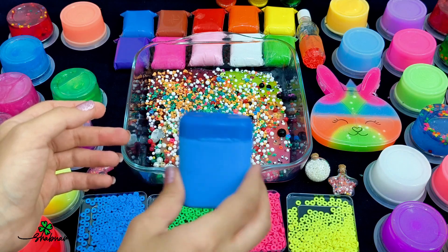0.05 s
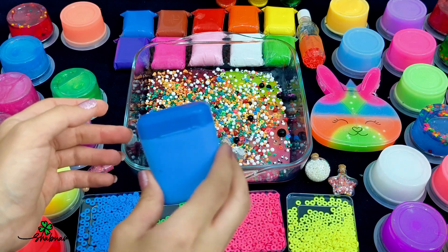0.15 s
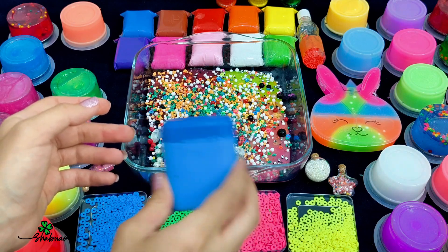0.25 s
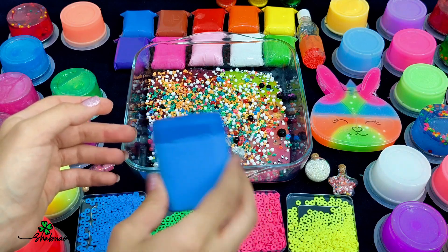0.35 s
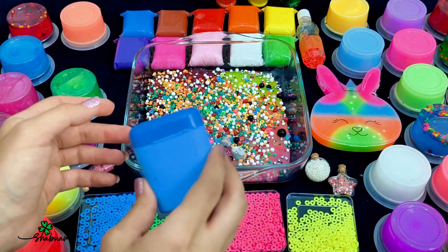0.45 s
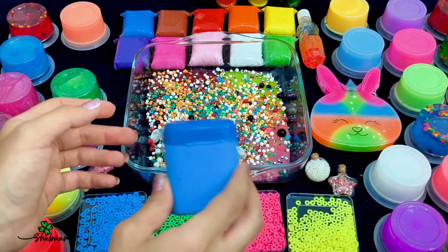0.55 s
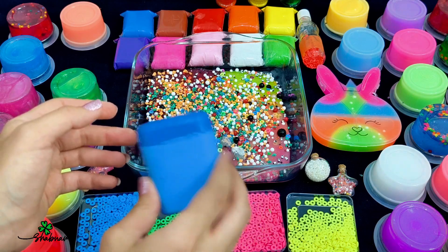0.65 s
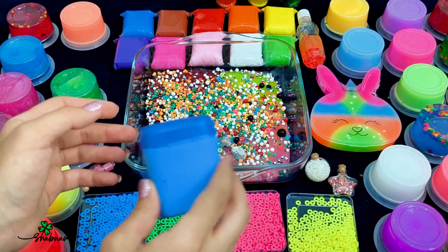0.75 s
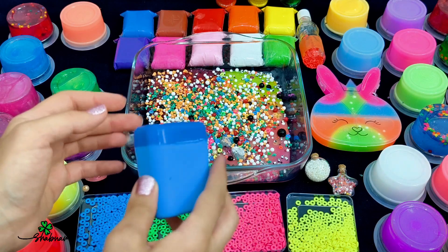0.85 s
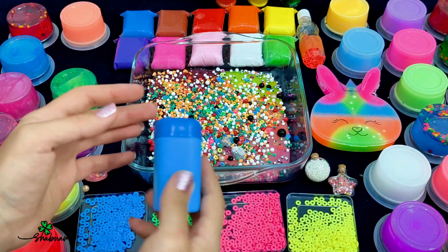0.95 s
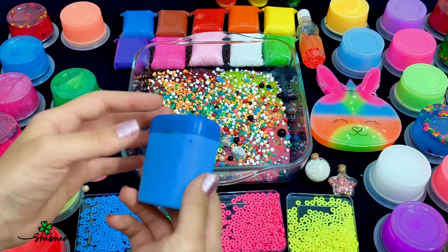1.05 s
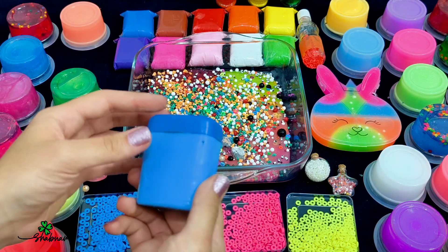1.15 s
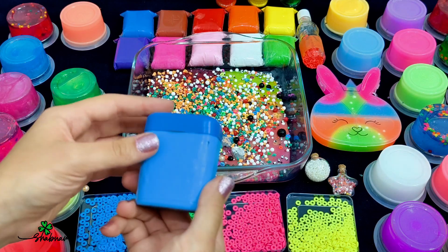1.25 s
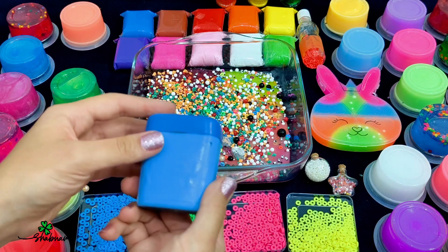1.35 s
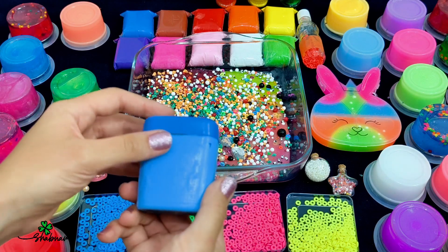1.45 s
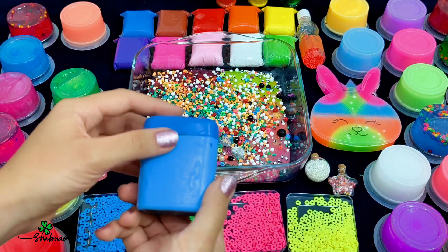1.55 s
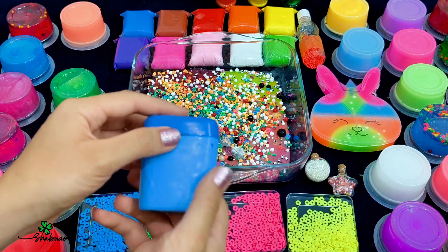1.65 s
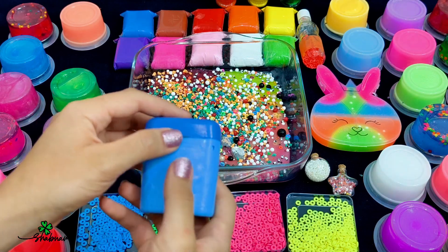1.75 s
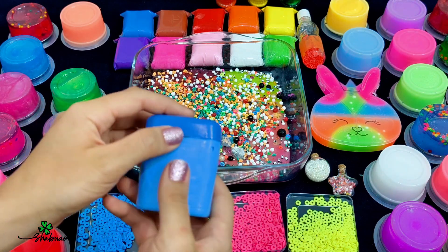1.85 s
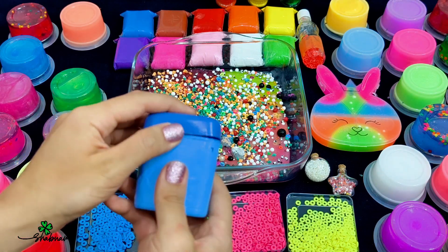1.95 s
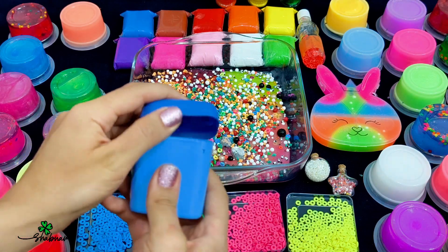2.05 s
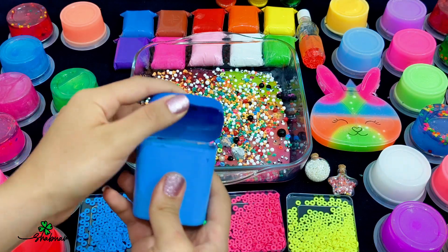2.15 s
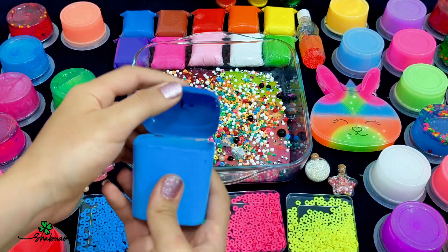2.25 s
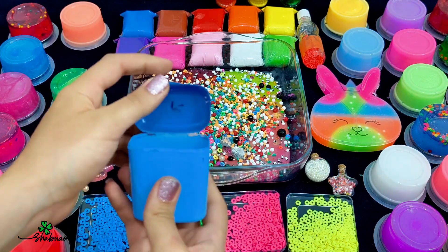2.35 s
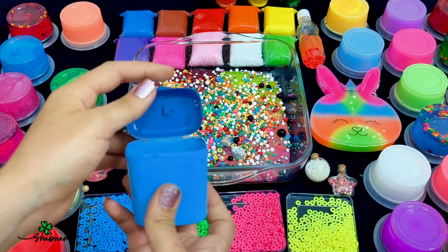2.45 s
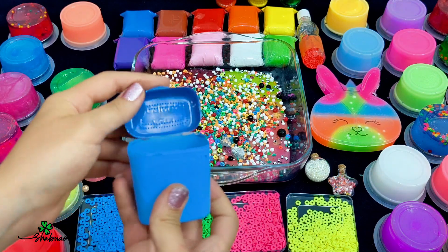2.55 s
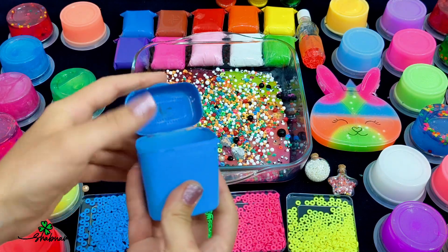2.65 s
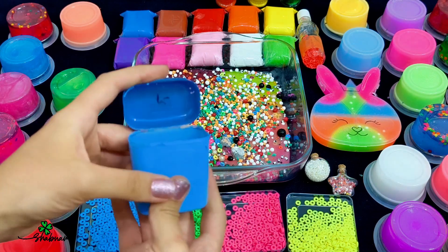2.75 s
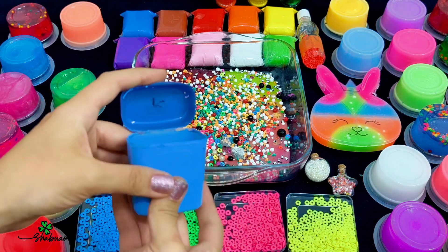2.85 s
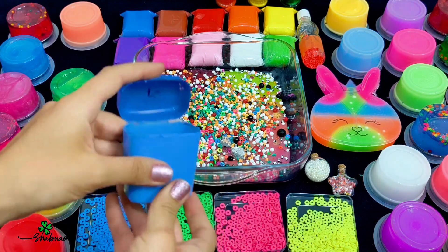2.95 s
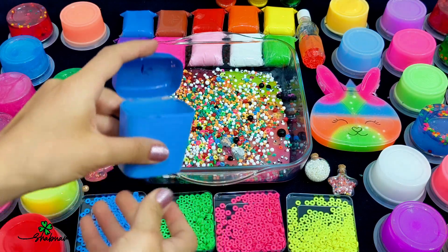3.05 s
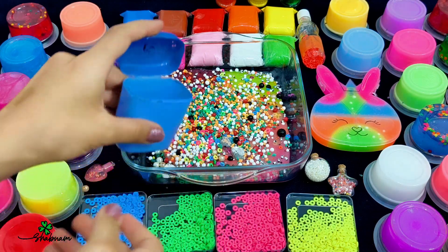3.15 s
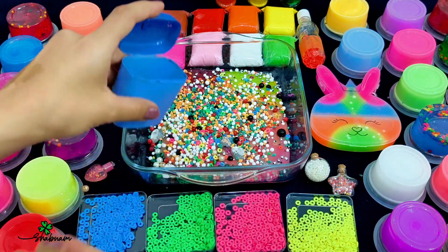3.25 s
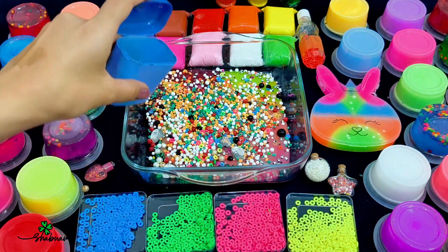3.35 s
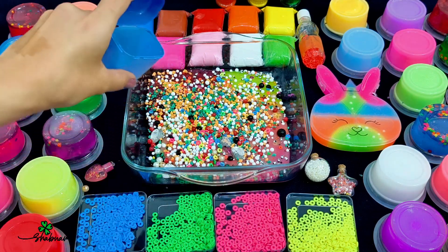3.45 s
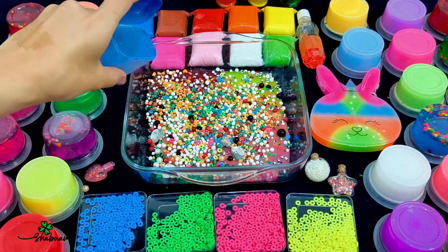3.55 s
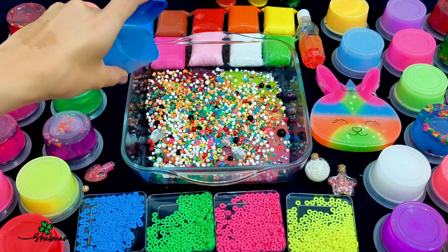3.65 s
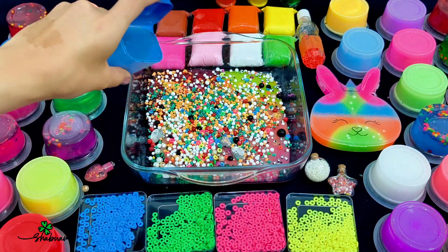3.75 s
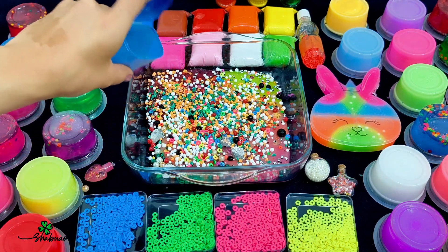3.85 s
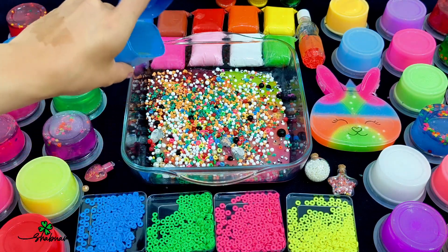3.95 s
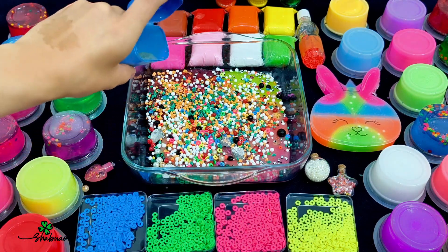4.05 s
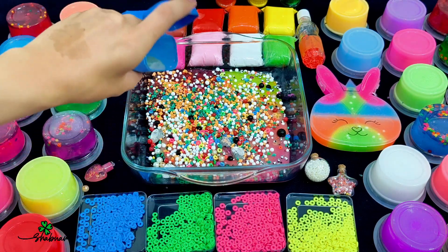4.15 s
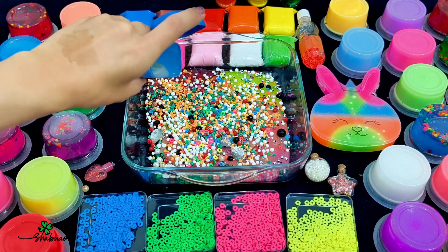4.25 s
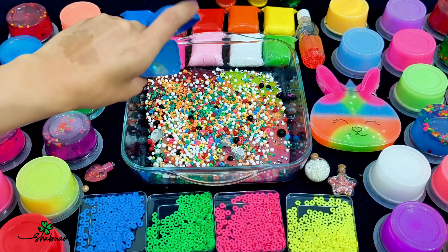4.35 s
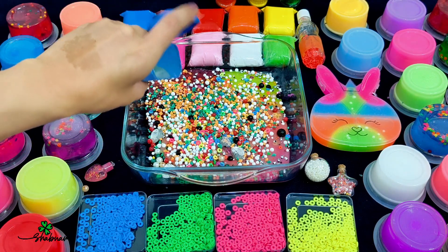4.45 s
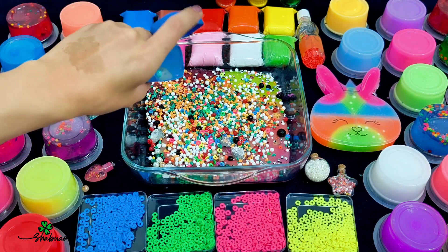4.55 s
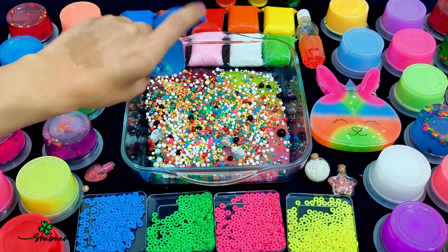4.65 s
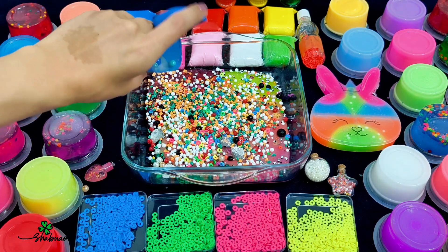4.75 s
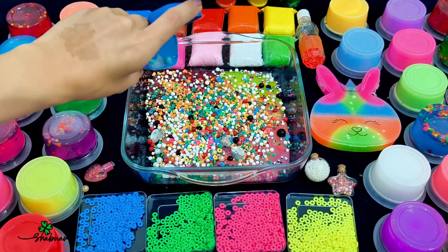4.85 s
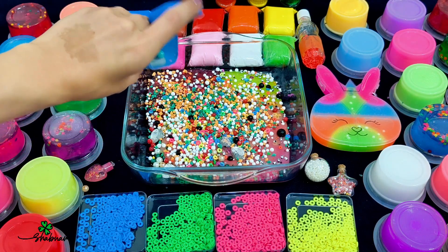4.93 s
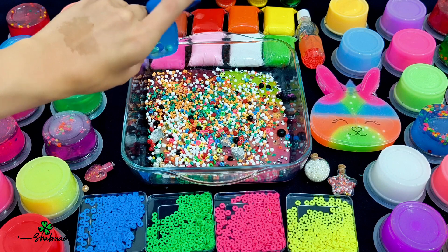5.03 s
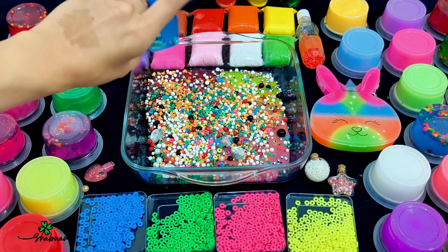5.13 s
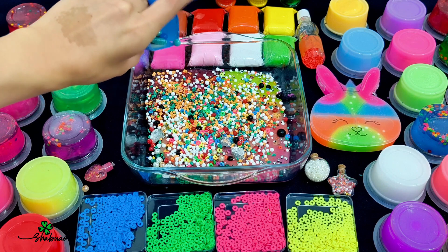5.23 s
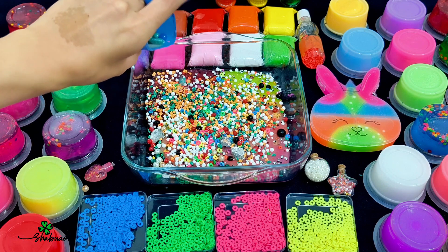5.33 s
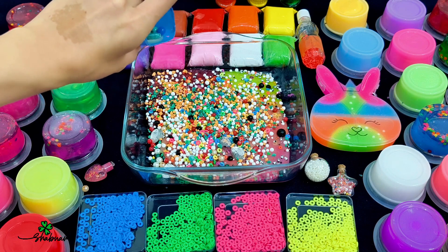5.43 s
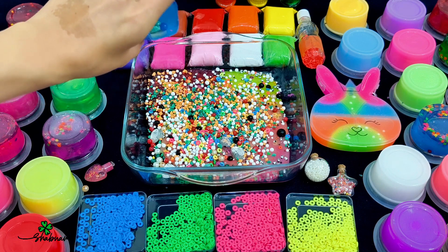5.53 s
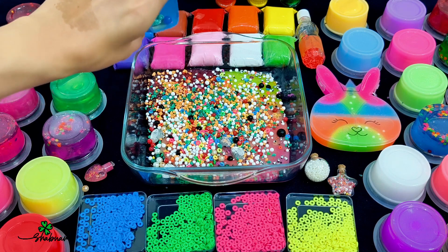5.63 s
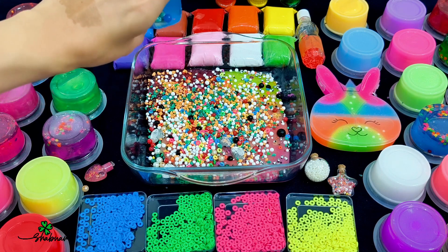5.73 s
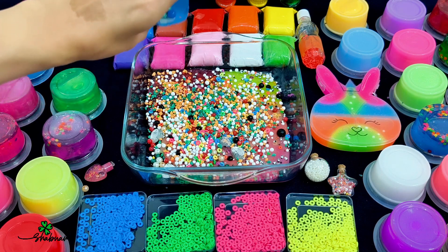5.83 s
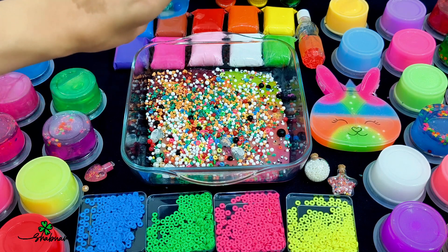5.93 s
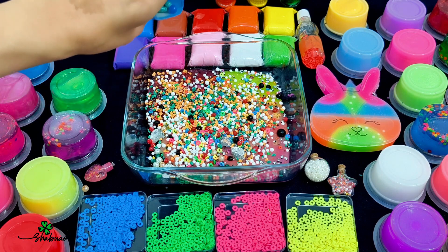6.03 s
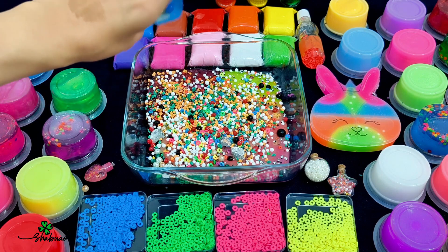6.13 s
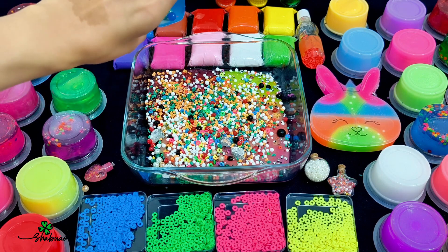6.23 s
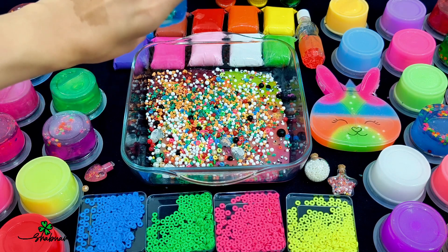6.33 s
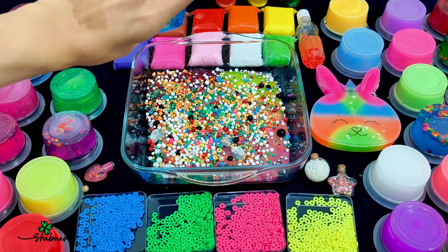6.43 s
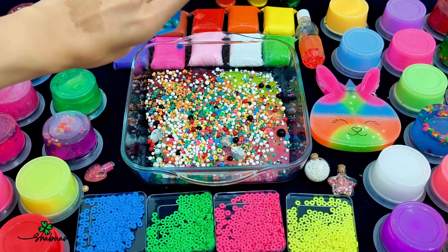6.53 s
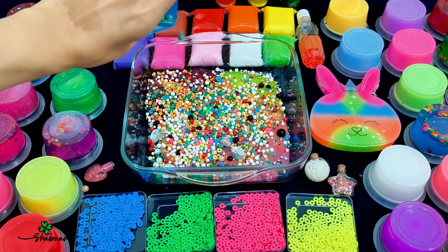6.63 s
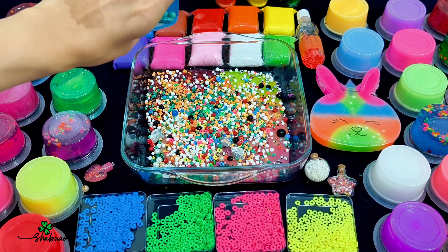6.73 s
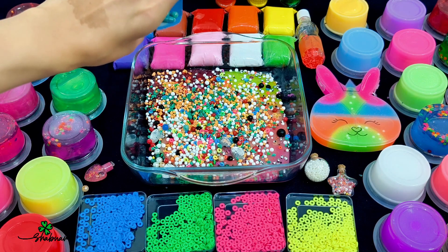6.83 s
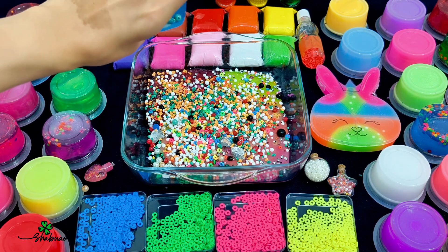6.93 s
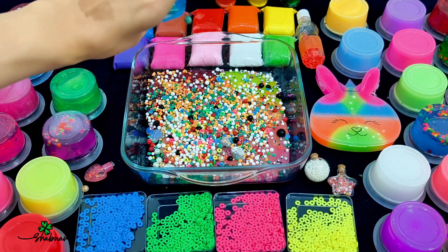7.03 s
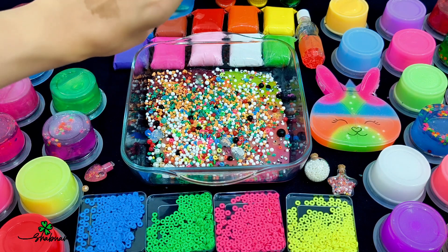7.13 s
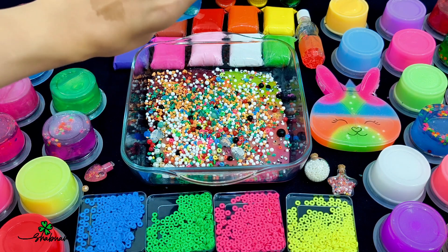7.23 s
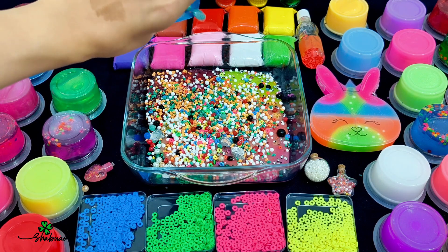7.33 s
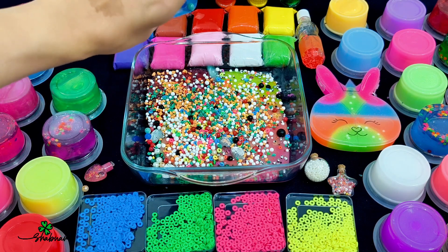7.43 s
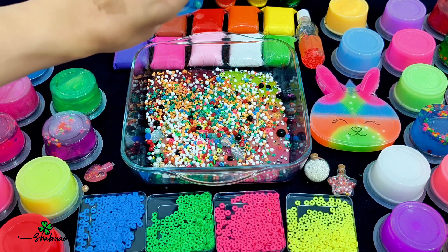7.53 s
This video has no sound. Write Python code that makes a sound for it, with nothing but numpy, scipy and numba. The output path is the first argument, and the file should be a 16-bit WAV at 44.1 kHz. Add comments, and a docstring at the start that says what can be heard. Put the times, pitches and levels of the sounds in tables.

```python
"""Small hard beads rattle in a flip-top plastic box held close to two microphone ports: shaken shut, the lid flipped
open with a puff and a creak, then tipped and jolted so that beads knock about and drop out. Each knock is a burst of
contact noise that rings the enclosed air and the walls and ticks; many small beads patter below, and the shut box
booms. A small room answers with decaying noise over room air and a motor hum of sines, and the ports colour it."""
import sys
import numpy as np
from scipy import signal
from scipy.fft import rfft, irfft
from scipy.io import wavfile
from scipy.ndimage import uniform_filter1d
from numba import njit

SR = 44100
rng = np.random.default_rng(int(sys.argv[2]) if len(sys.argv) > 2 else 0)


def file_out(sig):
    """Save sig as 16-bit WAV at sys.argv[1]."""
    # one column per channel
    cols = np.atleast_2d(sig).T
    # limit, then scale
    lim = np.clip(cols, -1, 1)
    pcm = np.round(lim * 32767).astype(np.int16)
    wavfile.write(sys.argv[1], SR, pcm)


N = 334278

# Loud knocks. Each row: moment in seconds, peaks in dB of the air ring, the walls and the tick, air ring in Hz.
KNOCK_ROWS = [(0.012, -14.5, -45, -49, 1720), (0.0229, -13.5, -34, -45, 1690),
              (0.0432, -13.5, -13, -20, 1690), (0.1075, -19, -55, -27, 1620), (0.138, -33, -20, -38, 1743),
              (0.1725, -22, -35, -18, 2080), (0.1782, -14, -13, -32, 1900),
              (0.2121, -20.5, -17.5, -11, 1690), (0.232, -42, -16, -16, 1910),
              (0.3281, -18, -31, -33, 2220), (0.3524, -24, -18, -29, 1840), (0.37, -17, -11.5, -9.5, 2120),
              (0.3998, -31, -17.5, -17, 1864), (0.417, -30, -19, -17, 1530), (0.423, -21, -30, -30, 1520),
              (0.449, -23, -8.5, -11.5, 2240), (0.4746, -17.5, -26, -22, 2100),
              (0.4922, -13, -36, -39, 1690), (0.5106, -13, -15, -12.5, 2000), (0.586, -37, -13, -15, 1830),
               (0.66, -8.5, -14.5, -21, 1760), (0.6884, -31, -20, -11.5, 1950),
              (0.6983, -22, -22, -16, 1860), (0.717, -30, -35, -34, 2150), (0.7759, -39, -11.5, -23, 2220),
              (0.8215, -14, -23, -20, 1620), (0.8409, -27, -13.5, -10.5, 2040),
              (0.8937, -20, -19, -32, 1650), (0.947, -20, -22, -27, 2030), (0.9683, -46, -38, -41, 1795),
              (0.9987, -25, -46, -47, 1740), (1.0261, -48, -21, -23, 2150), (1.0348, -51, -19.5, -15, 2080),
              (1.0845, -23.5, -31, -46, 1720), (1.114, -22.5, -32, -27, 1730),
              (1.1284, -36, -9.5, -11.5, 2070), (1.173, -29, -20, -26, 1760),
              (1.2108, -34, -22, -15.5, 1700), (1.2398, -29, -27, -32, 1640),
              (1.2792, -29, -19.5, -22.5, 1990), (1.3004, -39, -40, -44, 1860),
              (1.401, -45, -64, -70, 2024), (1.4961, -42, -35.5, -35, 1580),
              (1.5079, -31, -31.5, -52, 1820), (1.5388, -37, -32, -46, 1720),
              (1.626, -37.5, -42.5, -54, 1940), (1.7868, -51, -41.5, -48, 1437),
              (1.843, -48.5, -49, -49, 1660),  (1.9928, -35.5, -29, -34.5, 1830),
              (2.0397, -42, -39, -37, 1455), (2.07, -36, -32, -29.5, 1730), (2.1636, -41, -42, -35, 1050),
              (2.4926, -49, -41.5, -46, 2016),  (2.75, -38.5, -53, -57, 1720),
              (3.038, -21.5, -44, -32, 1960), (3.063, -25, -16, -16.5, 1890), (3.1336, -43, -31, -33, 2260),
              (3.1533, -16.5, -25.5, -26.5, 1280), (3.1834, -23.5, -23, -30, 1310),
              (3.202, -23, -44, -45, 1380), (3.235, -17, -19.5, -22, 1890), (3.284, -20, -22.5, -24, 2130),
              (3.3587, -26, -20, -26, 1815), (3.364, -25.5, -33, -35, 1280),
              (3.3953, -27, -27.5, -28, 1880), (3.446, -35, -38, -55, 1370), (3.523, -23, -25, -31.5, 1640),
              (3.5604, -23.5, -30, -51, 1750), (3.6028, -14.5, -23.5, -31, 1600),
              (3.6284, -23, -41, -39, 1660), (3.7356, -37, -43, -44, 1750), (3.759, -36.5, -56, -66, 1297),
              (3.7997, -29, -27.5, -50, 1340), (3.814, -29, -41, -32, 1520), (3.8508, -27, -24, -30, 1400),
              (3.8721, -22, -24.5, -33, 1980), (3.901, -23.5, -20, -24.5, 1820),
              (3.925, -26, -44, -50, 1330),  (4.2803, -40, -62, -63, 1498),
              (4.3082, -14.5, -20.5, -35, 1350), (4.3763, -34, -36, -36, 1320),
              (4.406, -29, -31.5, -41, 1390), (4.425, -29, -30, -48, 1600), (4.4323, -29, -30, -37, 1466),
              (4.5898, -30.5, -35, -54, 1750), (4.641, -29, -32.5, -53, 1440),
              (4.6623, -22.5, -24, -27.5, 1570), (4.7214, -18, -21.5, -24, 1860),
              (4.785, -43, -25.5, -47, 2020), (4.7958, -30, -26, -38, 1790),
              (4.8087, -14.5, -48, -33, 1530), (4.825, -25, -32, -40, 1530), (4.8502, -47, -32, -33, 1420),
              (4.9243, -16.5, -32, -26.5, 1530), (5.0059, -23.5, -49, -37, 1390),
              (5.022, -27, -50, -24.5, 1530), (5.076, -45, -28.5, -32.5, 1720),
              (5.1666, -20, -20.5, -23, 1430), (5.1787, -28, -20, -21.5, 1220),
               (5.2724, -16.5, -23.5, -28, 1490), (5.2833, -27, -28.5, -31, 1480),
              (5.38, -47, -31, -40, 1540), (5.3897, -25, -25.5, -32.5, 1480),
              (5.4351, -27.5, -51, -57, 1530), (5.481, -29, -44, -70, 1500),
              (5.5028, -34.5, -37, -41, 1475), (5.516, -33, -33, -31, 1428),
              (5.599, -24, -27.5, -20.5, 1450), (5.693, -54, -35.5, -35, 1590),
              (5.723, -24.5, -26, -33, 1470), (5.7374, -16.5, -34, -29.5, 1590),
              (5.8551, -27, -33, -46, 1860), (5.8684, -20, -43, -29, 1460), (5.9844, -38, -32.5, -42, 1650),
              (6.0011, -24.5, -29, -37, 1530), (6.0157, -22.5, -37, -37, 1660),
              (6.104, -23.5, -26.5, -33, 1540), (6.1306, -21.5, -40, -43, 1670),
              (6.1994, -28.5, -53, -62, 1520), (6.2114, -38, -45, -32, 1290),
               (6.2582, -32.5, -35, -30, 1240), (6.3566, -38, -33.5, -59, 1400),
              (6.4995, -24, -33, -30, 1380), (6.6331, -46, -27, -31, 1920), (6.7314, -53, -35, -50, 1544),
              (6.7445, -19, -25, -26, 1510), (6.868, -47, -35.5, -35, 2260), (6.9282, -62, -39, -30, 1580),
              (6.9838, -49, -33, -29.5, 2010), (6.995, -25.5, -31.5, -26, 1520),
              (7.062, -53, -55, -30, 1720), (7.136, -34, -25, -22.5, 1500), (7.1426, -17, -23, -33, 1610),
              (7.277, -37, -29, -34, 1740), (7.282, -35, -32, -28, 2380), (7.3585, -47, -33, -42, 2306),
              (7.4028, -55, -35, -27, 2030), (7.5358, -32, -44, -52, 1120), (7.5417, -38, -35, -36.5, 1950),
              ]
# How hard the small beads patter. Each row: moment in seconds, rms level at the walls in dB before unevenness.
SHAKING_LEVEL = [(0, -29), (.3, -26.5), (.65, -26.5), (.95, -35.5), (1.28, -55), (1.36, -68), (2.0, -73),
                 (2.14, -70), (2.3, -70.5), (2.5, -59.5), (2.68, -74.5), (2.78, -56), (2.97, -74),
                 (3.05, -41), (3.22, -45.5), (3.35, -64), (3.55, -67), (3.85, -55), (4.05, -72),
                 (4.27, -69.5), (4.35, -43), (4.55, -59), (4.8, -51), (5.25, -44), (5.5, -50.5),
                 (5.8, -53.5), (6.35, -50.5), (6.95, -54), (7.58, -50)]

SPAN = 1024  # samples given to the ring of one knock
OPENS_S = 2.03  # the lid opens


def knock_table():
    """Discrete impacts: the columns of the knocks, with their moments in samples."""
    s, air_db, wall_db, tick_db, air_hz = np.transpose(KNOCK_ROWS)
    at = np.clip((s * SR).astype(int), 0, N - 1)
    return at, air_db, wall_db, tick_db, air_hz


def knocks():
    """Impact excitation: a loud blow sets the enclosed air and the walls ringing and ticks at the contact."""
    at, air_db, wall_db, tick_db, air_hz = knock_table()
    note_hz = np.repeat(air_hz, SPAN)
    out = struck(at, air_db, "air", lambda x: air_ring(x, note_hz, width_hz=450))
    out += struck(at, wall_db, "walls", lambda x: walls_ring(x, size=SPAN))
    out += struck(at, tick_db, "tick", tick)
    return out


def struck(at, db, part, body):
    """Superposition: each blow rings the body on its own, is scaled to its peak and laid down at its moment."""
    train = np.zeros(len(at) * SPAN)
    train[::SPAN] = 1
    blows = body(chatter(train, part)).reshape(2, len(at), SPAN)
    power = uniform_filter1d(np.mean(blows ** 2, axis=0), size=40, axis=1)
    peak = np.sqrt(2 * power.max(axis=1))  # of a sine with the greatest short-time power
    scaled = blows * (undb(db) / peak)[:, None]
    out = np.zeros((2, N + SPAN))
    for i, blow in zip(at, np.swapaxes(scaled, 0, 1)):
        out[:, i:i + SPAN] += blow
    return out[:, :N]


def chatter(train, part, shorter=1):
    """Contact noise: every impulse becomes a burst that swells for a moment and dies."""
    # For each part: decay time of the contact chatter in seconds, for a full-sized knock.
    contact_s = {"air": 0.00084, "walls": 0.0016, "tick": 0.0017, "boom": 0.00074}
    # For each part: share of a blow's power that both ports hear alike.
    alike = {"air": .8, "walls": .4, "tick": .35, "boom": .95}
    fade = np.exp(-1 / (shorter * contact_s[part] * SR))
    swelling = signal.lfilter([1], [1, -fade ** 3], train)
    burst = signal.lfilter([1], [1, -fade], swelling)
    return burst * pair(alike[part], size=len(train))


def air_ring(x, hz, width_hz):
    """Cavity resonance: the air in the box gives one broad note and radiates little below it."""
    note = ring(ring(x, hz, 2 * width_hz), hz, width_hz)
    return above(note, 970, order=6)


def walls_ring(x, size):
    """Plate modes: the walls ring at several notes and are too small to radiate bass."""
    # Each row: mode in Hz, width in Hz, relative level in dB.
    wall_modes = [(2230, 220, -4), (2727, 417, -1), (3970, 404, -0.5), (4100, 138, 3.5), (4650, 1260, 0.5),
                  (5716, 410, 2.5), (6490, 780, -1)]
    # where a blow lands decides how strongly it wakes each mode: a spread of 3.5 dB
    return above(modes(x, wall_modes, 3.5, size=size), 1770, order=2)


def tick(x):
    """Short contact: the bare click holds treble only."""
    return above(x, 5500, order=2)


def patter():
    """Dense random impacts: many small beads wake the notes of the box, its walls and the contact tick."""
    # Notes of the box. Each row: centre in Hz before the pitch factor, width in Hz, relative level in dB.
    box_notes = [(1270, 170, -2), (1510, 150, 0), (1740, 200, -1), (2150, 220, -5)]
    # The notes shift as the box is opened and tipped. Each row: moment in seconds, pitch factor.
    pitch_track = [(0, 1.126), (2, 1.1), (3, 0.97), (5.3, 0.94), (6, 1.045), (7.58, 1.02)]
    AIR_RE_WALLS_DB, TICK_RE_WALLS_DB = (-8.5, -2.5), (-8, -7.5)  # (while shut, once open)
    UNEVEN_DB, UNEVEN_S = 4, 0.028  # the patter comes in uneven heaps
    BEAD_SHORTER = .3  # contact time of a small bead re a knock, for walls and tick

    at, air_db, wall_db, tick_db, _ = knock_table()
    shut = np.arange(N) / SR < OPENS_S
    shaking_db = curve(SHAKING_LEVEL)[0]
    wall_level = undb(shaking_db + UNEVEN_DB * uneven(UNEVEN_S))
    air_level = undb(shaking_db + np.where(shut, *AIR_RE_WALLS_DB) + UNEVEN_DB * uneven(UNEVEN_S))
    tick_level = wall_level * undb(np.where(shut, *TICK_RE_WALLS_DB))

    pitch = curve(pitch_track)[0]
    notes = [(hz * pitch, width, db) for hz, width, db in box_notes]
    # square blows on the floor move the air, glancing ones only click; both wake the walls
    square = beads(600, 2.9)
    glancing = beads(600, 4.5)
    air = unit(modes(chatter(square, "air"), notes, 2.86, size=SPAN))
    walls = unit(walls_ring(chatter(glancing + square, "walls", BEAD_SHORTER), size=256))
    ticks = unit(tick(chatter(glancing, "tick", BEAD_SHORTER)))

    out = above(rolling(at, air_db, air_level, "air") * air, 990, order=6)
    out += rolling(at, wall_db, wall_level, "walls") * walls
    out += rolling(at, tick_db, tick_level, "tick") * ticks
    return out


def boom():
    """Modal overlap: the long modes of the shut box sum many beads into a near steady boom."""
    # Each row: mode in Hz, width in Hz, relative level in dB.
    shut_modes = [(321, 203, -8.5), (466, 170, -3), (772, 43, 2), (845, 97, 3), (1340, 1400, -5.5)]
    BOOM_DB, SLOPE = -10.5, 1.08  # re the walls at the hardest shaking; dB lost per dB of shaking
    at, _, wall_db, _, _ = knock_table()
    shut = np.arange(N) / SR < OPENS_S
    shaking_db = curve(SHAKING_LEVEL)[0]
    hardest_db = shaking_db.max()
    level = undb(BOOM_DB + hardest_db + SLOPE * (shaking_db - hardest_db))
    note = unit(modes(chatter(beads(1300, 3.2), "boom"), shut_modes, 1.2, size=SPAN))
    return shut * rolling(at, wall_db, level, "boom") * note


def beads(per_s, spread_db):
    """Poisson-like arrivals: impulses at random moments, mostly small, at most 10 dB."""
    size_db = np.minimum(spread_db * rng.exponential(size=N), 10)
    return (rng.random(N) < per_s / SR) * undb(size_db)


def rolling(at, db, level, part):
    """Addition of powers: the steady shaking plus the beads that each knock sets rolling."""
    # For each part: level in dB re the knock before the rise smooths it, amplitude decay time in seconds.
    settling = {"air": (-15.5, 0.024), "walls": (-14.5, 0.026), "tick": (-14.5, 0.027),
                "boom": (-26, 0.024)}
    settle_db, settle_s = settling[part]
    power = np.zeros(N)
    power[at] = undb(2 * (db + settle_db))
    rise = np.exp(-1 / (0.0036 * SR))  # the beads take 3.6 ms to get rolling
    power = signal.lfilter([1 - rise], [1, -rise], power)
    power = signal.lfilter([1], [1, -np.exp(-2 / (settle_s * SR))], power)
    return np.sqrt(level ** 2 + power)


def lid():
    """Stick-slip into an opening cavity: a low puff, then dense hinge slips ring the climbing air note."""
    AJAR_HZ, OPEN_HZ, CLIMB_S = 405, 1090, 0.032  # the note of the air climbs as the lid swings up
    CREAK_DB, FULL_S, HOLD_S = -42, 2.072, 0.069
    SWELL_DB_PER_S, FADE_DB_PER_S = 500, 480
    STOP_S, STOP_DB, STOP_FADE_DB_PER_S = 2.163, -38.5, 902  # the lid meets its stop
    s = np.arange(N) / SR
    hz = OPEN_HZ - (OPEN_HZ - AJAR_HZ) * np.exp(-np.clip(s - OPENS_S, 0, None) / CLIMB_S)
    swell_db = SWELL_DB_PER_S * np.clip(FULL_S - s, 0, None)
    fade_db = FADE_DB_PER_S * np.clip(s - FULL_S - HOLD_S, 0, None)
    creak = undb(CREAK_DB - swell_db - fade_db)
    stop = (s > STOP_S) * undb(STOP_DB - STOP_FADE_DB_PER_S * np.clip(s - STOP_S, 0, None))

    note = ring(chatter(beads(1500, 2.0), "air"), hz, .2 * hz)
    # slips also wake a broad overtone
    note += 0.76 * ring(chatter(beads(340, 3.5), "air"), 1.8 * hz, 0.52 * hz)
    return (creak + stop) * unit(note / np.sqrt(hz)) + puff()


def puff():
    """Released air: as the catch lets go, a low decaying sine falls in pitch."""
    START_S, START_HZ, START_DB, T60_S, FALL_S = 2.026, 420, -35, .09, .016
    t = np.clip(np.arange(N) / SR - START_S, 0, None)
    cycles = START_HZ * FALL_S * (1 - np.exp(-t / FALL_S))
    return undb(START_DB - 60 * t / T60_S) * np.sin(2 * np.pi * cycles)


def room(x):
    """Diffuse reverberation: dense echoes, each octave dying at its own rate, with a tail for each port."""
    # Each row: frequency in Hz, time to die by 60 dB in seconds.
    decay_times = [(300, 0.061), (1300, 0.2), (4000, 0.37), (12000, 0.04)]
    # Each row: frequency in Hz, share of the tail's power alike in both ports.
    tail_alike = [(300, 1), (1000, 0.59), (2500, 0.027)]
    t = np.arange(int(.5 * SR)) / SR
    tail = 0
    for hz in 250 * 2. ** np.arange(7):
        octave = ring(pair(along(tail_alike, hz), size=len(t)), hz, hz)
        tail = tail + octave * undb(-60 * t / along(decay_times, hz))
    tail *= np.clip(t / 0.0025, 0, 1)  # the echoes build up over 2.5 ms
    tail /= np.sqrt(np.sum(tail ** 2, axis=1, keepdims=True))
    mono = x.mean(axis=0, keepdims=True)
    return undb(-8) * signal.fftconvolve(mono, tail, axes=1)[:, :N]


def room_air():
    """Partly coherent noise: shaped by its spectrum, more alike in both ports at some pitches than others."""
    # Each row: frequency in Hz, relative density in dB per Hz.
    air_spectrum = [(18, -71), (30, -25), (79, -6.5), (194, -9), (252, -13.5), (303, -12.5), (336, -14.5),
                    (394, -14.5), (1160, -27.5), (1540, -32.5), (16000, -36.5)]
    # Each row: frequency in Hz, share of the power alike in both ports.
    air_alike = [(50, 0.71), (150, 0.32), (600, 0.45), (3000, .1)]
    hz = np.fft.rfftfreq(N, 1 / SR)
    like = np.clip(along(air_alike, hz), 0, 1)
    shared, left, right = rfft(rng.standard_normal((3, N)))
    mixed = np.sqrt(like) * shared + np.sqrt(1 - like) * np.array([left, right])
    return undb(-55) * unit(irfft(undb(along(air_spectrum, hz)) * mixed, N))


def motor_hum():
    """Line spectrum: steady sines whose levels each waver a little."""
    # Each row: frequency in Hz, rms level in dB before the waver.
    hum_lines = [(100, -75), (300, -70), (399.7, -58)]
    t = np.arange(N) / SR
    hum = 0
    for hz, db in hum_lines:
        level = np.sqrt(2) * undb(db + 0.55 * uneven(.088))
        hum = hum + level * np.sin(2 * np.pi * (hz * t + rng.random()))
    return hum


def undb(db):
    """Logarithmic level: decibels to gain."""
    return 10 ** (np.asarray(db) / 20)


def unit(x):
    """Mean power: scaled to rms 1."""
    return x / np.sqrt(np.mean(x ** 2))


def curve(table):
    """Linear interpolation: columns of a table, sample by sample; the last value holds."""
    s, *columns = np.transpose(table)
    return [np.interp(np.arange(N) / SR, s, c) for c in columns]


def along(table, hz):
    """Logarithmic pitch: a spectrum read on a log-frequency axis."""
    log_hz, values = np.log(np.array(table)[:, 0]), np.array(table)[:, 1]
    return np.interp(np.log(hz + 1), log_hz, values)


@njit
def svf(x, g, k):
    """Two coupled integrators: a state-variable band-pass with a moving centre, gain 1 there."""
    y = np.empty_like(x)
    for c in range(len(x)):
        band, low = 0., 0.
        for i in range(x.shape[1]):
            v = (band + g[i] * (x[c, i] + 1e-18 - low)) / (1 + g[i] * (g[i] + k[i]))
            band = 2 * v - band
            low = low + 2 * g[i] * v
            y[c, i] = k[i] * v
    return y


def ring(x, hz, width_hz):
    """Damped oscillator: one resonance, longer the narrower it is."""
    hz = hz * np.ones(x.shape[1])
    return svf(x, np.tan(np.pi * hz / SR), width_hz / hz)


def modes(x, table, place_db, size):
    """Modal sum: resonances of alternating sign, each woken by a share that changes every `size` samples."""
    length = x.shape[1]
    out = 0
    for k, (hz, width, db) in enumerate(table):
        draws = rng.standard_normal(length // size + 1)
        share_db = place_db * np.repeat(draws, size)[:length]
        out = out + (-1) ** k * undb(db) * ring(x * undb(share_db), hz, width)
    return out


def pair(like, size=N):
    """Partial coherence: noise for two ports with a share of the power in common."""
    shared, left, right = rng.standard_normal((3, size))
    like = np.clip(like, 0, 1)
    return np.sqrt(like) * shared + np.sqrt(1 - like) * np.array([left, right])


def above(x, hz, order):
    """High-pass: a maximally flat filter removes what lies below."""
    return signal.sosfilt(signal.butter(order, hz, "high", fs=SR, output="sos"), x)


def uneven(seconds):
    """Smoothed chance: noise averaged twice, with spread 1."""
    width = int(seconds * SR)
    once = uniform_filter1d(rng.standard_normal(N), width)
    return unit(uniform_filter1d(once, width))


def scene():
    """Superposition: the box in the hand, its room and the background."""
    near = knocks() + patter() + boom() + lid()
    return near + room(near) + room_air() + motor_hum()


def port(x, colour):
    """Minimum phase: a causal filter from the folded cepstrum of the colour."""
    cepstrum = irfft(np.log(undb(along(colour, np.fft.rfftfreq(1024, 1 / SR)))))
    cepstrum[1:512] *= 2
    cepstrum[513:] = 0
    return signal.fftconvolve(x, irfft(np.exp(rfft(cepstrum))))[:N]


def record(dry):
    """Path delay and port colour: the right port lies further off; rumble and the top are cut."""
    # Colour of the left port. Each row: frequency in Hz, gain in dB.
    left_colour = [(100, -3), (520, 2), (630, 1.5), (760, 3.5), (1800, -1.5), (1960, -6.5), (2120, 0.5),
                   (4400, -2), (6300, -3.5), (7100, -9.5), (8450, 6.5), (9200, 3), (12500, 0),
                   (15500, -6.5)]
    # Colour of the right port. Each row: frequency in Hz, gain in dB.
    right_colour = [(100, -5), (520, 1), (630, -3.5), (760, 3), (1800, -2.5), (1960, -3.5), (2120, 0),
                    (4400, -2.5), (6500, -2.5), (7300, 2.5), (8600, -3), (12500, -5.5), (14500, -3)]
    lag = 6  # samples
    right = np.concatenate([np.zeros(lag), dry[1, :-lag]])
    wet = np.array([port(dry[0], left_colour), port(right, right_colour)])
    wet = above(wet, 41, order=4)
    return signal.sosfilt(signal.ellip(10, .3, 60, 15900, fs=SR, output="sos"), wet)


dry = scene()
out = record(dry)
file_out(out)
```